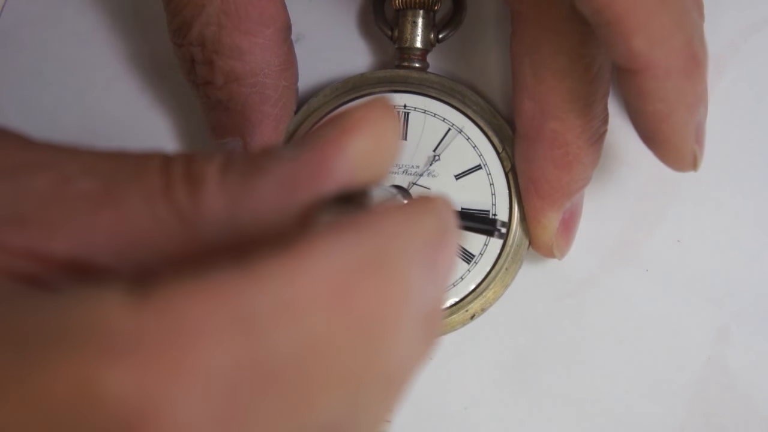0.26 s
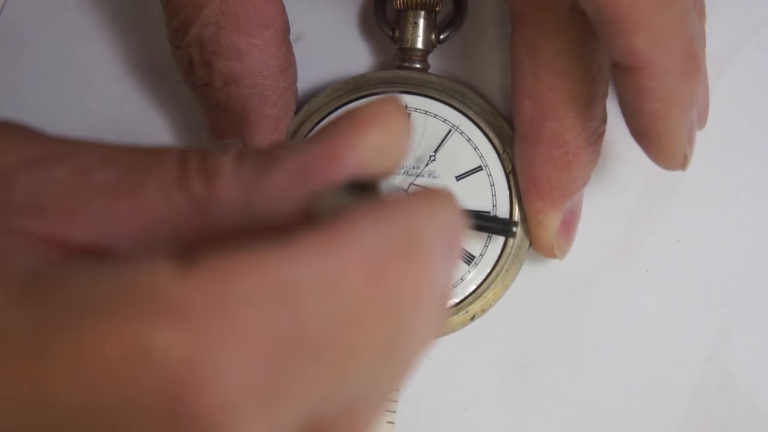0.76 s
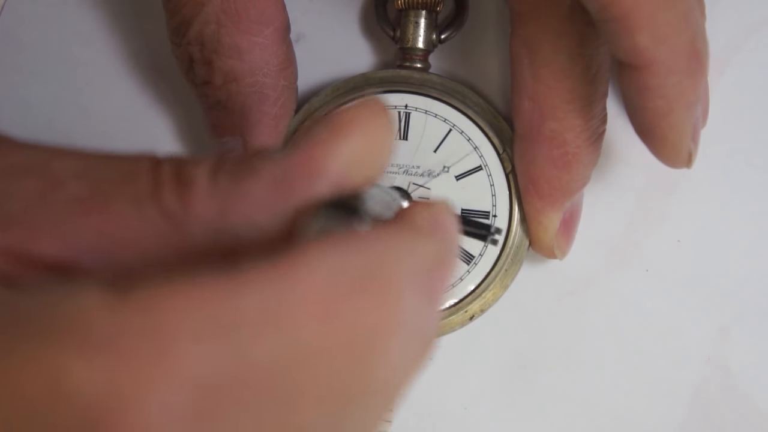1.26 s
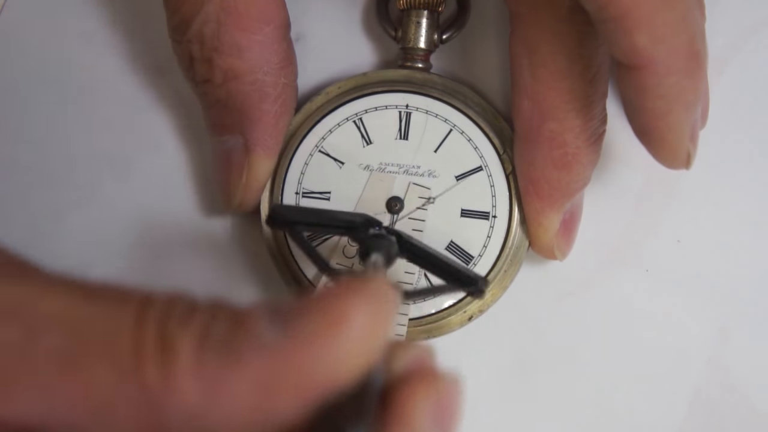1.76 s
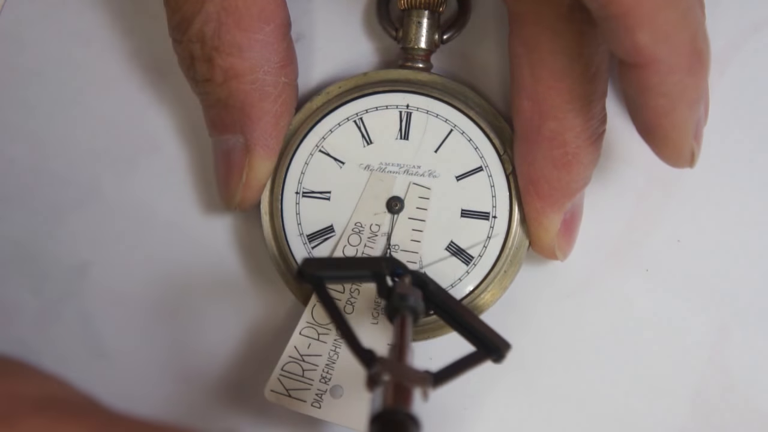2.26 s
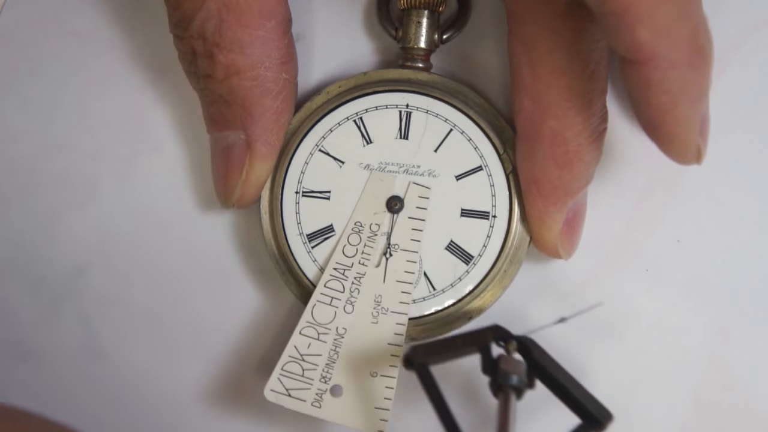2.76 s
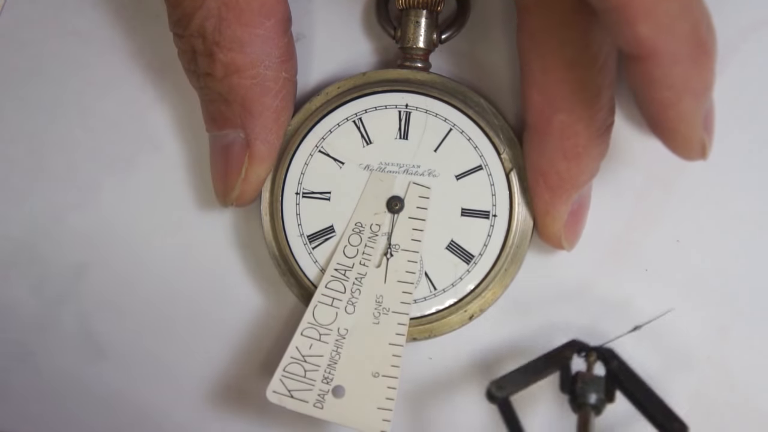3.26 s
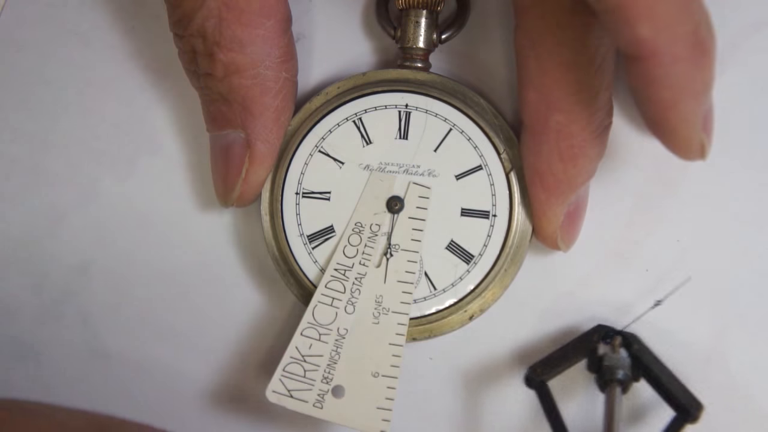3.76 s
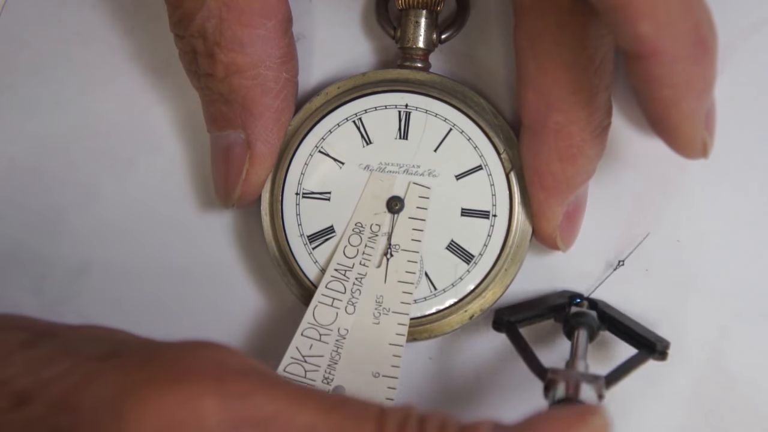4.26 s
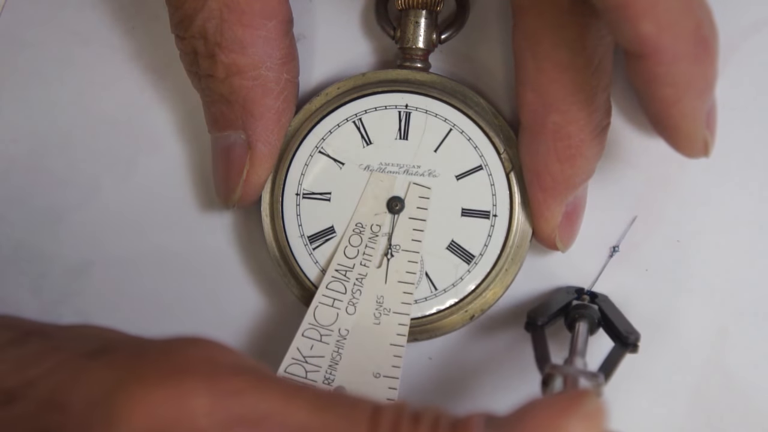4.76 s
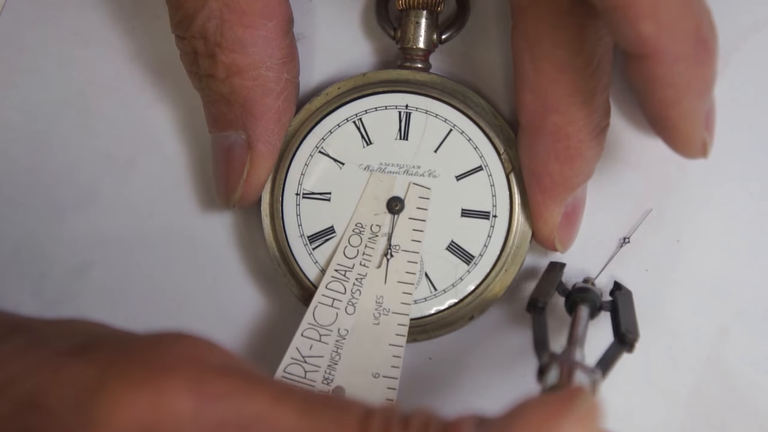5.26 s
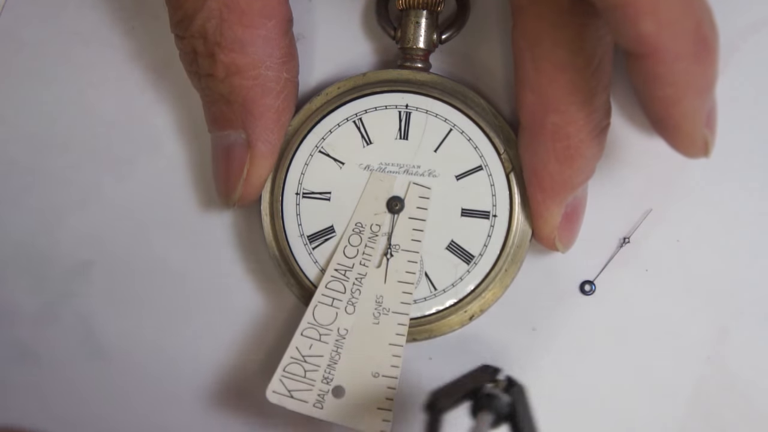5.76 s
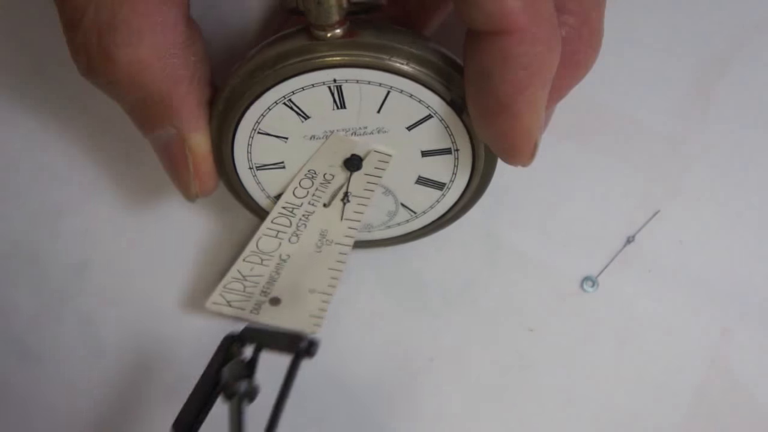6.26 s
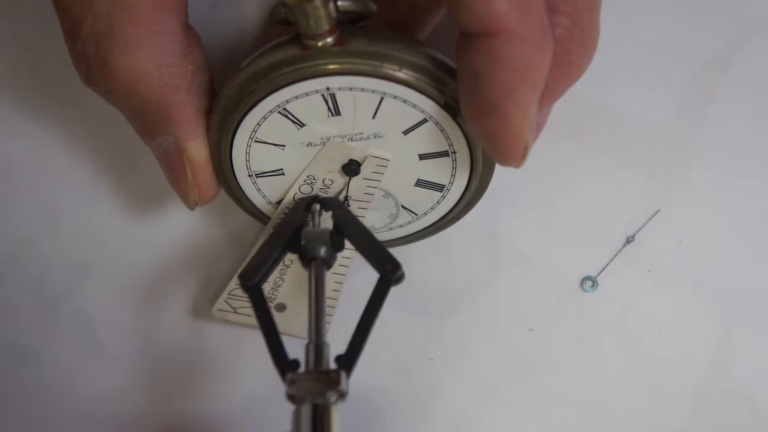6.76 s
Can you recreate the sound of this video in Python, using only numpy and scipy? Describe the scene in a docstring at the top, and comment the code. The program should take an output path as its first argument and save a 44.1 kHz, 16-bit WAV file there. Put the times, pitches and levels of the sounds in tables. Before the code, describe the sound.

Overlapping crisp ticking of many timepieces over faint air noise, broken by a loud tool snap, a case knock and a late small clink.

```python
"""A watchmaker's bench in a small quiet room: watches and clocks tick throughout, each at its own pace.
Their beats are noise bursts through resonant bodies; soft air noise, a rustle and mains hum lie underneath.
Early on a hand puller snaps a hand off a pocket watch and then knocks on the case, ringing damped modes.
About a second later a hand thuds softly on the bench; near the end the puller clinks once more."""
import sys
import numpy as np
from scipy import signal
from scipy.fft import rfft, irfft, next_fast_len
from scipy.io import wavfile
from scipy.ndimage import uniform_filter1d

SR = 44100
rng = np.random.default_rng(int(sys.argv[2]) if len(sys.argv) > 2 else 0)


def store_pcm(level_fs):
    """Save levels as 16-bit WAV."""
    pcm = np.round(np.clip(level_fs, -1, 1) * 32767).astype(np.int16)
    wavfile.write(sys.argv[1], SR, np.atleast_2d(pcm).T)


N = 309582
TOP_HZ = 16000  # upper band limit
NEAR_CYCLE_S = 1.0128  # the nearest watch repeats two ticks and two tocks in this time

# broad spectrum of a sharp click under the resonances: (frequency [Hz], relative level [dB])
STEEL_CLICK = [(60, -49), (300, -16.5), (1200, 2.5), (3500, 0.5), (9000, 7.5), (14000, -23), (17000, 3)]
# broad spectrum of a duller click: (frequency [Hz], relative level [dB])
DULL_CLICK = [(60, -46), (160, -16), (300, 5), (1200, -22), (5000, 9), (10000, 4), (17000, -42)]
# resonance at a pallet stone's hard first contact: (frequency [Hz], bandwidth [Hz], relative level [dB])
PALLET = [(9900, 890, 25)]
# modes of the bench top: (frequency [Hz], relative level [dB], t60 [s])
BENCH = [(88, -23, .13), (152, -18, 0.1), (239.6, -6, 0.14), (313, -3.5, 0.027), (395, -7, 0.083),
         (557, -18, 0.073)]


def near_watch():
    """Impact excitation: a pallet stone cracks into a tick or tock, then the lever's drop rings the plate."""
    # one cycle, tick and tock in turn: (time [s], relative level [dB])
    near_beats = [(0.2028, -26), (0.4680, -30), (0.7065, -25.5), (0.9724, -30.5)]
    # lag behind an even pace: (time [s], lateness [s])
    near_drift = [(.5, .0348), (.7, 0), (1.5, 0), (1.7, .004), (2.3, .004), (2.5, .002), (2.7, 0),
                  (6.05, 0), (6.28, -.0243), (6.54, -.0278), (6.78, -.0248)]
    # resonances of the tick: (frequency [Hz], bandwidth [Hz], relative level [dB])
    tick_ring = [(2573, 72, 15), (2750, 80, 5), (3040, 66, 12), (5000, 50, 7), (5540, 33, 15.5),
                 (6580, 87, 14.5), (6960, 100, 12.5), (7400, 50, 25), (7700, 250, 4.5), (9750, 80, 21),
                 (9720, 150, 23.5), (10500, 200, 2), (10720, 420, 14.5)]
    # resonances of the tock: (frequency [Hz], bandwidth [Hz], relative level [dB])
    tock_ring = [(2540, 35, 12), (3060, 180, 8.6), (4070, 20, 13.4), (5030, 55, 18), (5830, 29, 13.4),
                 (6200, 100, 9.4), (7070, 97, 24), (7300, 53, 13), (7990, 43, 19.5), (9100, 14, 18.2),
                 (9900, 120, 14), (10310, 300, 22.5), (10920, 120, 14)]
    # modes of the main plate: (frequency [Hz], relative level [dB], t60 [s])
    plate = [(1200, -26, 0.11), (1470, -22, 0.047), (1953, -5, 0.02), (2017, -10, 0.035),
             (2330, -11, 0.027), (2563, -18, 0.027), (2670, -17, 0.013), (3040, -13.5, 0.017)]
    tick_drop_s, tock_drop_s = 0.0047, 0.0035  # the lever drops this long after the beat
    drop_db = 6.5  # drop above its beat
    going = accented(escapement(near_beats, NEAR_CYCLE_S, near_drift))
    ticks, tocks = going[::2], going[1::2]

    tick = strikes(beats(ticks, gain_db=1.5, t60=0.047), tick_ring, STEEL_CLICK,
                   wet_db=-1.5, pan_db=-1.5, repeat=0.37)
    tock = strikes(beats(tocks, gain_db=3.0, t60=0.057), tock_ring, STEEL_CLICK,
                   wet_db=0.0, pan_db=-1.0, repeat=0.73)
    drops = [(s + tick_drop_s, db + drop_db, 12000) for s, db in ticks]
    drops += [(s + tock_drop_s, db + drop_db, 12000) for s, db in tocks]
    drop = impacts(drops, plate, low_hz=696, wet_db=-5.5, pan_db=-1.5, lag=8.3, spread=0.48, vary_db=4.0)
    crack = strikes(beats(going, gain_db=-1.0, t60=0.011), PALLET, DULL_CLICK,
                    wet_db=-23, pan_db=-12.0, chatter_db=-1.0)
    return tick + tock + drop + crack


def accented(going):
    """Unequal impulse: some beats (time [s], level [dB]) land harder or softer than the rest."""
    # beats that stand out: (time [s], extra level [dB])
    hard_beats = [(1.48, 2), (1.99, -2.5), (2.73, 1), (3.505, 0.5), (3.745, 0.5), (4.01, 0), (5.77, 1),
                  (6.035, 1.5)]
    reach_s = NEAR_CYCLE_S / 10
    return [(s, db + sum(extra for at, extra in hard_beats if abs(at - s) < reach_s)) for s, db in going]


def tool():
    """Modal ringing: the puller snaps the hand free, knocks on the case and clinks; the bench is bumped."""
    # contacts as the hand lets go: (time [s], level [dB], brightness [Hz])
    snaps = [(.24275, -9.5, 9000), (.24363, -10.5, 12900), (.24439, -10, 6300)]
    # contacts as the puller knocks on the case: (time [s], level [dB], brightness [Hz])
    knocks = [(.7664, -33, 9800), (.767, -11, 5300), (.76878, -30, 30000), (.76925, -16.5, 11000),
              (.8178, -19.5, 2000), (.8255, -25, 1300), (.854, -32.5, 7000)]
    # contacts as its jaws clink: (time [s], level [dB], brightness [Hz])
    clinks = [(6.58726, -19, 7000), (6.58786, -23, 5700), (6.58865, -18, 18300), (6.58926, -27, 13200)]
    # bumps on the bench: (time [s], level [dB], brightness [Hz])
    bumps = [(.246, -32.5, 2000), (.767, -29, 1300), (.8175, -24, 1200), (.8238, -29.5, 900)]
    # modes rung by the snap: (frequency [Hz], relative level [dB], t60 [s])
    snap_ring = [(816, -19, 0.011), (1460, -20.5, 0.058), (1980, -20, .12), (2210, -23, 0.051),
                 (2780, -7, .007), (3060, -14, 0.017), (3306, -12, 0.054), (4000, -8, 0.011),
                 (4600, -10.5, 0.009), (5240, -12, 0.0036), (5830, -6, 0.016), (6100, -8, 0.014),
                 (7040, -6, 0.011), (7250, 1.5, 0.017), (7620, 6.5, 0.0057), (9800, -3.5, .008)]
    # modes rung by the knock: (frequency [Hz], relative level [dB], t60 [s])
    knock_ring = [(555, -12.5, 0.013), (794, -4, 0.011), (1120, -12, 0.048), (1280, -14.5, 0.041),
                  (1445, -13.5, 0.038), (1900, -14.5, 0.015), (2050, -15, .06), (2610, -3, 0.019),
                  (3480, -3, 0.0044), (4720, 2, 0.0054), (5770, -8, 0.012), (6840, 1, 0.0074),
                  (9400, 4, .003)]
    # modes rung by the clink: (frequency [Hz], relative level [dB], t60 [s])
    clink_ring = [(2880, -2, 0.0055), (3400, -8, 0.0098), (4500, -0.5, 0.0083), (5250, 7, 0.0029),
                  (6728, -10, .008), (7150, -5, .025), (8500, -1, 0.0063), (10700, -4, .003)]
    # dry crack of the hand leaving its post: (time [s], level [dB], t60 [s], brightness [Hz])
    cracks = [(.2429, -21.5, 0.029, 14000)]
    # broad spectrum of that crack: (frequency [Hz], relative level [dB])
    crack_colour = [(100, -27), (600, -5), (1800, 0), (4000, -4), (6000, 1), (8000, 2), (11000, -3),
                    (14000, -23)]

    snap = impacts(snaps, snap_ring, low_hz=910, wet_db=-15.5, pan_db=0.5, lag=0.46, room_t60=0.39)
    knock = impacts(knocks, knock_ring, low_hz=300, wet_db=-10.0, pan_db=1.5, lag=0.58, spread=0.52)
    clink = impacts(clinks, clink_ring, low_hz=2330, wet_db=-14.0, pan_db=5.5, lag=8.1, spread=0.54)
    bump = impacts(bumps, BENCH, low_hz=190, wet_db=-3, pan_db=2.0, lag=1.5, spread=0.23)
    crack = strikes(cracks, [], crack_colour, wet_db=-6, pan_db=3.0, lag=0.6)
    return snap + crack + knock + clink + bump


def second_watch():
    """Direct-to-reverberant ratio: a thinner watch sounds further off, with more of the room on it."""
    # one cycle, tick and tock: (time [s], relative level [dB])
    second_beats = [(0.1518, -33), (0.3832, -30.5)]
    # lag behind an even pace: (time [s], lateness [s])
    second_drift = [(0, -.004), (1.2, -.003), (2.3, .004), (3.69, .007), (3.9, -.001), (4.7, .0005),
                    (4.93, -.0035), (7, 0)]
    # resonances of the tick: (frequency [Hz], bandwidth [Hz], relative level [dB])
    tick_ring = [(2150, 1500, 5.7), (2820, 41, 9.3), (3080, 37, 15.5), (4180, 25, 17.5), (4920, 58, 19),
                 (5680, 77, 14), (6400, 75, 20), (7050, 150, 23.7), (7950, 44, 27.7), (10200, 170, 25.7),
                 (10700, 430, 19.1)]
    # resonances of the tock: (frequency [Hz], bandwidth [Hz], relative level [dB])
    tock_ring = [(2040, 230, 8.4), (2840, 72, 9.3), (3000, 45, 11.4), (5770, 50, 17), (6400, 80, 16),
                 (6740, 100, 16.5), (7000, 65, 19), (7380, 270, 18.8), (9600, 150, 21), (10250, 75, 7.1),
                 (10550, 260, 21.1)]
    going = escapement(second_beats, cycle_s=0.50528, drift=second_drift)
    tick = strikes(beats(going[::2], gain_db=3.0, t60=0.06), tick_ring, STEEL_CLICK, wet_db=5.5, pan_db=-1.5)
    tock = strikes(beats(going[1::2], gain_db=0, t60=0.055), tock_ring, STEEL_CLICK, wet_db=7.5, pan_db=-0.5)
    crack = strikes(beats(going, gain_db=-3.0, t60=0.014, delay=0.0013), PALLET, DULL_CLICK,
                    wet_db=-16, pan_db=-34.0)
    return tick + tock + crack


def dull_clock():
    """Body resonance: a hollow case takes the edge off the clock's beat."""
    # one cycle: (time [s], relative level [dB])
    dull_beats = [(0.0224, -38.5), (0.2766, -38)]
    # lag behind an even pace: (time [s], lateness [s])
    dull_drift = [(.3, .06), (.5, 0), (6.05, 0), (6.25, -.077)]
    # resonances of the hollow case: (frequency [Hz], bandwidth [Hz], relative level [dB])
    dull_ring = [(930, 250, 13.6), (1270, 38, 22.2), (1434, 76, 15), (1685, 76, 19.7), (2670, 120, 20.9)]
    going = escapement(dull_beats, cycle_s=0.50175, drift=dull_drift)
    return strikes(beats(going, gain_db=4.5, t60=0.06), dull_ring, DULL_CLICK, wet_db=-7.0, pan_db=0.0)


def quick_clock():
    """Two-stage excitation: a small fast clock's faint woody unlocking knock comes before a thin ping."""
    # one cycle: (time [s], relative level [dB])
    quick_beats = [(0.1998, -37.5), (0.4394, -42)]
    # resonances of the ping: (frequency [Hz], bandwidth [Hz], relative level [dB])
    quick_ring = [(2340, 65, 15), (6020, 320, 22.6), (5900, 180, 23), (6670, 110, 10), (7740, 500, 1.6)]
    # resonances of the woody knock: (frequency [Hz], bandwidth [Hz], relative level [dB])
    wood = [(535, 24, 30.6), (603, 21, 30), (692, 29, 26.7), (844, 18, 25.6), (1140, 180, 24.8)]
    going = escapement(quick_beats, cycle_s=0.4792)
    ping = strikes(beats(going, gain_db=7.5, t60=0.046), quick_ring, STEEL_CLICK, wet_db=-20, pan_db=9.0)
    unlocking = beats(going, gain_db=-13.0, t60=0.06, bright_hz=4900, delay=-0.038)
    knock = strikes(unlocking, wood, DULL_CLICK, wet_db=8.0, pan_db=-0.5)
    return ping + knock


def handling():
    """Low-frequency modal excitation: the watchmaker's hand shifts and thuds softly on the bench."""
    # soft thuds: (time [s], level [dB], brightness [Hz])
    thuds = [(1.785, -28, 105), (1.808, -32.5, 230), (1.858, -27, 90)]
    return impacts(thuds, BENCH, low_hz=75, wet_db=-9, pan_db=1.5, lag=1.5, spread=0.25)


def far_clocks():
    """Reverberant transmission: one steady faint clock and stray ticks, with plenty of room echo."""
    # one cycle of the clock across the room: (time [s], relative level [dB])
    far_beats = [(0.2215, -38), (0.462, -44)]
    # single faint bright ticks, some landing on the dull clock's first beats: (time [s], relative level [dB])
    stray_ticks = [(.057, -40), (.078, -39), (.344, -40), (1.968, -37.5), (2.309, -43), (3.858, -38),
                   (5.671, -38), (6.148, -40.5), (6.333, -42)]
    # resonances of the faint ticks: (frequency [Hz], bandwidth [Hz], relative level [dB])
    far_ring = [(650, 260, 10), (1090, 83, 2.2), (2410, 770, 8.8), (8300, 530, 4.3), (8600, 940, 9.7)]
    ticks = escapement(far_beats, cycle_s=0.4855) + stray_ticks
    return strikes(beats(ticks, gain_db=2.5, t60=0.039), far_ring, STEEL_CLICK,
                   wet_db=-2.0, pan_db=-0.5, alike=0.59)


def pendulum_clock(swell_db_per_s=0.24):
    """Case resonance and reverberation: a slow far wall clock beats softly and grows slowly louder."""
    # one cycle: (time [s], relative level [dB])
    pendulum_beats = [(0.27, -57), (0.655, -48)]
    # resonances of the wooden case: (frequency [Hz], bandwidth [Hz], relative level [dB])
    pendulum_case = [(332, 110, 14.5), (526, 34, 18), (640, 130, 14.5), (840, 150, 15), (1310, 610, 16)]
    middle_s = N / SR / 2
    going = escapement(pendulum_beats, cycle_s=0.761)
    swings = [(s, db + swell_db_per_s * (s - middle_s)) for s, db in going]
    return strikes(beats(swings, gain_db=1.5, t60=0.15, bright_hz=2500), pendulum_case, DULL_CLICK,
                   wet_db=1.5, pan_db=3.0)


def room_floor(air_db=-45.5, shared=0.013, waver_rad=0.089):
    """Filtered noise and harmonic hum: softly mottled air under mains harmonics of unsteady phase."""
    # spectral shape of the air noise: (frequency [Hz], relative density [dB])
    air_shape = [(15, -55), (25, -24), (85, -8), (233, 1), (433, -3), (703, 0), (1240, -4.5), (1530, -3.5),
                 (2360, -1.5), (3530, -9.5), (7500, -5.5), (10400, -9), (11800, -38), (12800, -40),
                 (13900, -34), (15500, -45)]
    # mains harmonics: (frequency [Hz], rms level [dB])
    mains = [(120, -86), (240, -68.5), (360, -71.5), (480, -71.5), (600, -71.5)]
    size, t = next_fast_len(N), np.arange(N) / SR
    hz = np.fft.rfftfreq(size, 1 / SR)
    noise = rng.standard_normal((3, size))
    pair = patchy(noise[:2] + np.sqrt(shared) * noise[2], depth_db=3.5)
    air = unit(irfft(rfft(pair) * amp(along(air_shape, hz)), size)[:, :N])
    hum = np.zeros(N)
    for mains_hz, db in mains:
        wander = np.interp(t, np.linspace(0, t[-1], 30), rng.standard_normal(30))
        hum += amp(db) * np.sqrt(2) * np.sin(2 * np.pi * mains_hz * t + waver_rad * wander)
    return amp(air_db) * air + hum


def room_rustle(level_db=-57):
    """Modulated band noise: a low, lumpy rustle whose bands come and go."""
    # spectral shape of the rustle: (frequency [Hz], relative density [dB])
    rustle = [(200, -34), (450, -7.5), (620, -2), (900, 0.5), (1300, -11.5), (2200, -38)]
    size = next_fast_len(N)
    hz = np.fft.rfftfreq(size, 1 / SR)
    noise = rng.standard_normal((2, size)) + rng.standard_normal(size)  # partly common to both sides
    lumpy = patchy(noise, depth_db=7.0, size=1024)
    return amp(level_db) * unit(irfft(rfft(lumpy) * amp(along(rustle, hz)), size)[:, :N])


def escapement(cycle, cycle_s, drift=((0, 0),), scatter_db=0.28):
    """Quasi-periodic release: a movement repeats its cycle, early or late as it drifts, with uneven force."""
    first_s, db = np.transpose(cycle)
    turns = np.arange(-1, int(N / SR / cycle_s) + 1)
    even = (turns[:, None] * cycle_s + first_s).ravel()
    times = even + np.interp(even, *np.transpose(drift))
    levels = np.tile(db, len(turns)) + scatter_db * rng.standard_normal(len(times))
    return [(s, level) for s, level in zip(times, levels) if s < N / SR]


def beats(rows, gain_db, t60, bright_hz=30000, delay=0):
    """Impulsive forcing: beats as blows (time [s], level [dB], t60 [s], brightness [Hz])."""
    return [(s + delay, db + gain_db, t60, bright_hz) for s, db in rows]


def strikes(rows, ring, click, wet_db, pan_db, alike=0.42, repeat=0.25, chatter_db=2.0, room_t60=0.34,
            lag=5, vary_db=1.55, bands=14, size=16384):
    """Source-filter principle: each blow's burst of tiny contacts and its echo sound through a body."""
    # colour of the echoes: (frequency [Hz], level [dB])
    room_tone = [(200, 10), (1500, 7), (3000, 2), (7000, -5.5), (10500, -7.5), (14000, -8.5)]
    t, hz = np.arange(size) / SR, np.fft.rfftfreq(size, 1 / SR)
    power = amp(2 * along(click, hz))
    for f, width_hz, db in ring:
        power = power + amp(2 * db) / (1 + ((hz ** 2 - f ** 2) / (hz * width_hz + 1)) ** 2)
    body = causal(unit(np.sqrt(power))) * amp([[pan_db / 2], [-pan_db / 2]])
    walls = causal(amp(along(room_tone, hz)))
    # the direct sound reaches the left port lag samples later
    ports = np.exp(-2j * np.pi * hz / SR * np.array([[lag], [0]]))
    echo = amp(wet_db - 60 * t / room_t60) * (1 - np.exp(-t / 0.0073))
    # alike: power share common to both ports; repeat: power share common to all blows
    same = rng.standard_normal((5, size))  # the same parts meet and the same walls answer at every blow
    out = np.zeros((2, N))
    for s, db, t60, bright_hz in rows:
        noise = np.sqrt(repeat) * same + np.sqrt(1 - repeat) * rng.standard_normal(same.shape)
        decay = amp(-60 * t / t60) * (1 - np.exp(-t / 0.000084))
        # the parts chatter as they settle
        chatter = unit(uniform_filter1d(rng.standard_normal(size), size=24))
        bounces = decay * amp(chatter_db * chatter)
        bounces *= np.linalg.norm(decay) / np.linalg.norm(bounces)
        burst = (np.sqrt(alike) * noise[4] + np.sqrt(1 - alike) * noise[:2]) * bounces
        tail = noise[2:4] * echo * np.sqrt(t60 / room_t60)  # the echo's energy follows the blow's
        soft = 1 / (1 + 1j * hz / bright_hz) ** 2  # a soft contact lacks treble
        # each blow favours other bands
        favour = np.interp(hz, np.linspace(0, TOP_HZ, bands), rng.standard_normal(bands))
        colour = body * soft * causal(amp(vary_db * favour))
        colour /= np.sqrt(np.mean(abs(colour) ** 2))
        add(out, s, amp(db) * irfft((rfft(burst) * ports + rfft(tail) * walls) * colour))
    return out


def impacts(rows, modes, low_hz, wet_db, pan_db, lag, spread=0.47, vary_db=1.5, room_t60=0.26, size=16384):
    """Modal superposition: clean contacts ring a body's damped modes, radiated weakly below low_hz."""
    t, hz = np.arange(size) / SR, np.fft.rfftfreq(size, 1 / SR)
    mode_hz, mode_db, t60 = np.transpose(modes)[:, :, None]
    signs = (-1) ** np.arange(len(modes))[:, None]  # neighbouring modes swing against each other
    swings = signs * amp(mode_db - 60 * t / t60) * np.sin(2 * np.pi * mode_hz * t)
    rings = rfft(swings) * (1j * hz / (low_hz + 1j * hz)) ** 2
    # each mode meets the two ports at a different phase, spread in radians
    facing = np.exp(1j * spread * np.array([[1], [-1]]) * rng.choice([-1, 1], len(modes)))
    delays = np.exp(-2j * np.pi * hz / SR * np.array([[lag], [0]]))  # left port late by lag samples
    ports = amp([[pan_db / 2], [-pan_db / 2]]) * delays
    echo = amp(-60 * t / room_t60) * (1 - np.exp(-t / 0.0018))
    echo *= amp(wet_db) / np.linalg.norm(echo)
    fade = np.minimum(1, 2 * (1 - t / t[-1]))
    out = np.zeros((2, N))
    for s, db, bright_hz in rows:
        weights = facing * amp(vary_db * rng.standard_normal(len(modes)))
        body = (weights[:, :, None] * rings).sum(axis=1) / (1 + 1j * hz / bright_hz) ** 2
        walls = rfft(echo * rng.standard_normal((2, size)))
        add(out, s, amp(db) * irfft(body * (ports + walls)) * fade)
    return out


def patchy(noise, depth_db, steady_hz=450, size=512):
    """Time-frequency modulation: bands swell and fade, progressively less below steady_hz."""
    hz, _, z = signal.stft(noise, SR, nperseg=size)
    field = uniform_filter1d(rng.standard_normal(z.shape[1:]), size=6, axis=0)  # across frequency
    field = uniform_filter1d(field, size=8, axis=1)  # across time
    depth = depth_db * np.minimum(1, hz / steady_hz)[:, None] ** 2
    return signal.istft(z * amp(depth * unit(field)), nperseg=size)[1][:, :noise.shape[1]]


def amp(db):
    """Logarithmic level: decibels to linear gain."""
    return 10 ** (np.asarray(db) / 20)


def unit(x):
    """Root-mean-square normalisation: scale to rms 1."""
    return x / np.sqrt(np.mean(x ** 2) + 1e-20)


def along(points, hz):
    """Logarithmic frequency scale: interpolate points (frequency [Hz], value) on it."""
    f, v = np.transpose(points)
    return np.interp(np.log(hz + 1), np.log(f + 1), v)


def causal(gain):
    """Minimum phase: fold the cepstrum to get the causal response that has this gain."""
    cep = irfft(np.log(np.maximum(gain, 1e-6)))
    half = len(cep) // 2
    cep[1:half] *= 2
    cep[half + 1:] = 0
    return np.exp(rfft(cep))


def add(out, s, sound):
    """Linear superposition: mix a stereo sound into out at time s [s]."""
    start = round(s * SR)
    piece = sound[:, max(-start, 0):max(N - start, 0)]
    out[:, max(start, 0):][:, :piece.shape[1]] += piece


def scene():
    """Superposition of the timepieces, the tool, the hand and the room."""
    watches = near_watch() + second_watch()
    clocks = dull_clock() + quick_clock() + far_clocks() + pendulum_clock()
    return watches + tool() + clocks + handling() + room_floor() + room_rustle()


def record(dry):
    """Saturation and band limiting: two unequal capsules round off peaks, with a dip near 12.5 kHz."""
    # capsule imbalance: (frequency [Hz], left minus right [dB])
    mic_balance = [(60, -2), (110, 1.5), (200, 1), (380, -0.5), (700, 1), (1290, 0.5), (2380, 0.5),
                   (4400, 1), (8120, 1), (15000, -2)]
    # response common to both capsules: (frequency [Hz], gain [dB])
    mic = [(10700, 2), (11200, -12), (11800, -22.5), (12500, -29), (13000, 6), (13400, 12.5), (14000, 11),
           (14700, -2), (15600, -30)]
    ceiling = 1.3  # asymptote of the rounding, full scale = 1
    size = 2 * next_fast_len(N // 2 + SR // 4)
    hz = np.fft.rfftfreq(size, 1 / SR)
    capsules = amp(along(mic_balance, hz) * np.array([[.5], [-.5]]))
    response = causal(amp(along(mic, hz))) * (hz < TOP_HZ)
    rounded = ceiling * np.tanh(dry / ceiling)
    return irfft(rfft(rounded, size) * capsules * response, size)[:, :N]


dry = scene()
out = record(dry)
store_pcm(out)
```